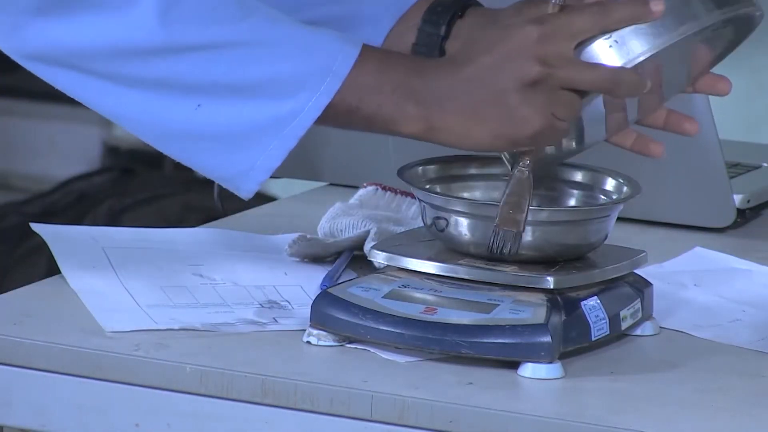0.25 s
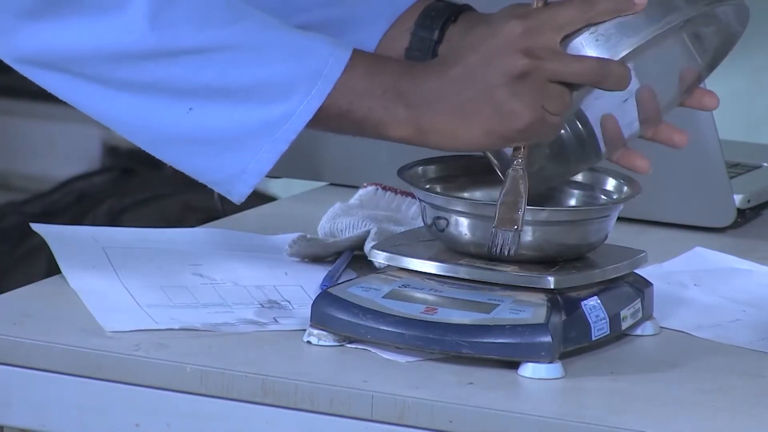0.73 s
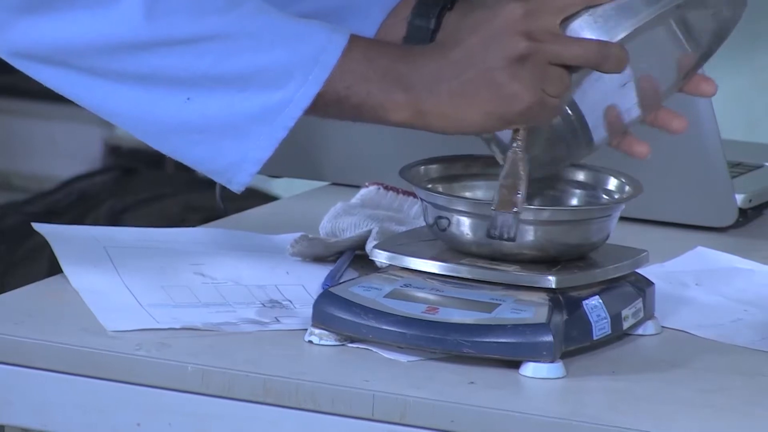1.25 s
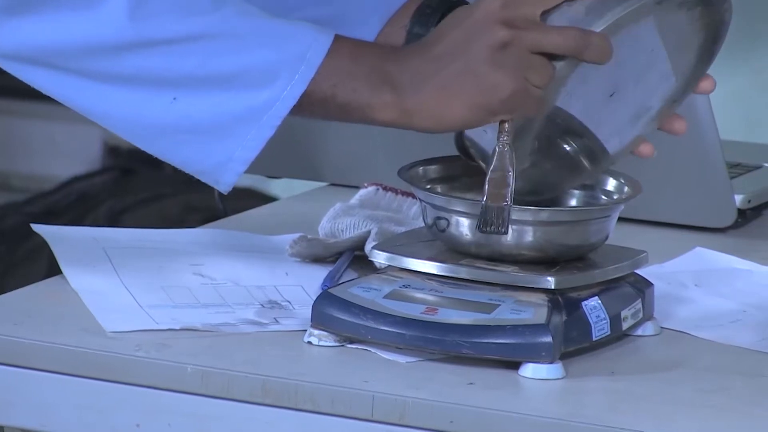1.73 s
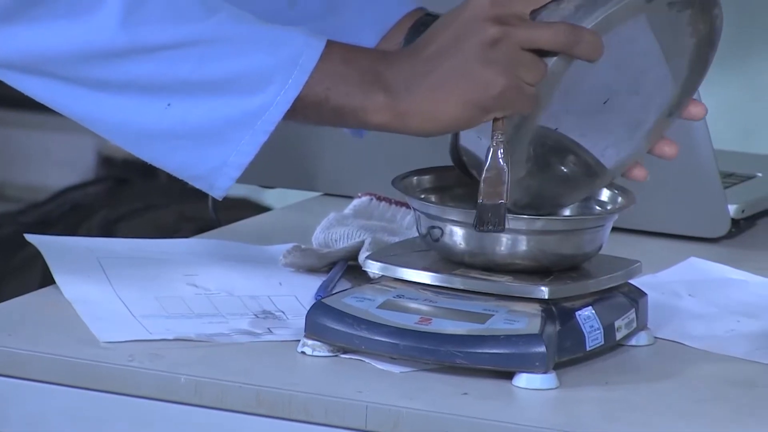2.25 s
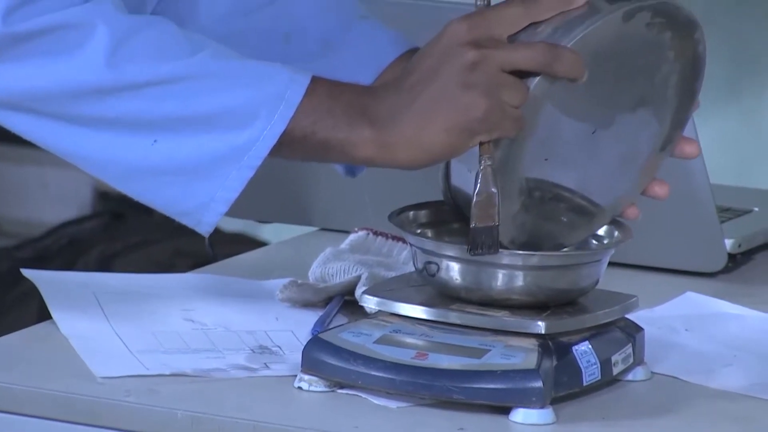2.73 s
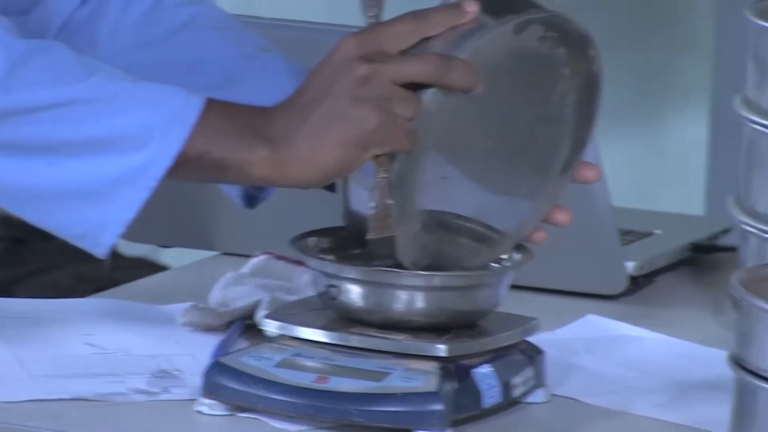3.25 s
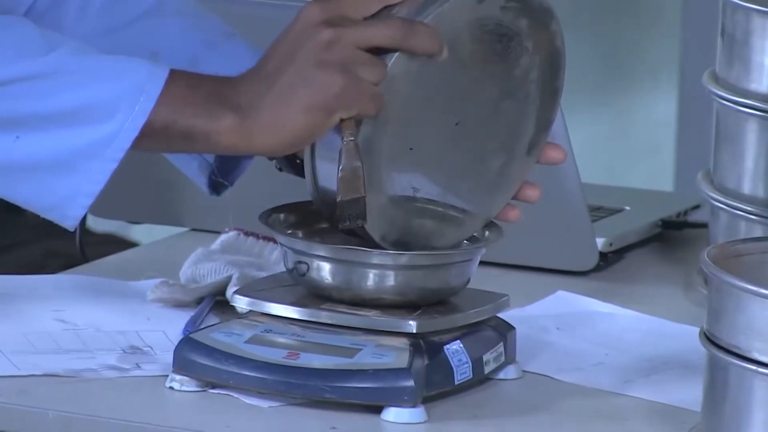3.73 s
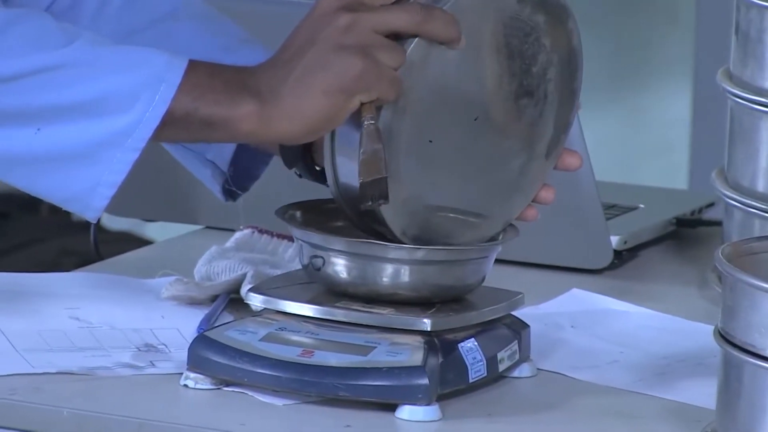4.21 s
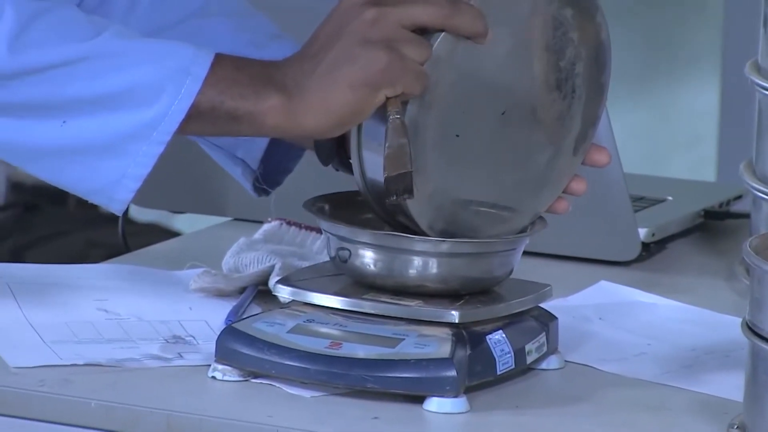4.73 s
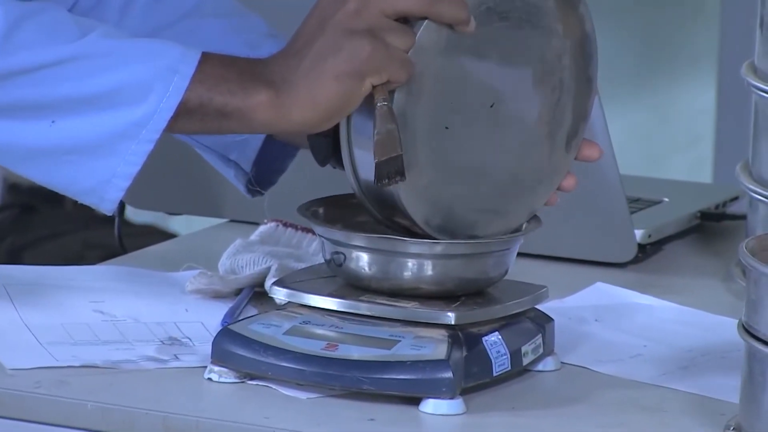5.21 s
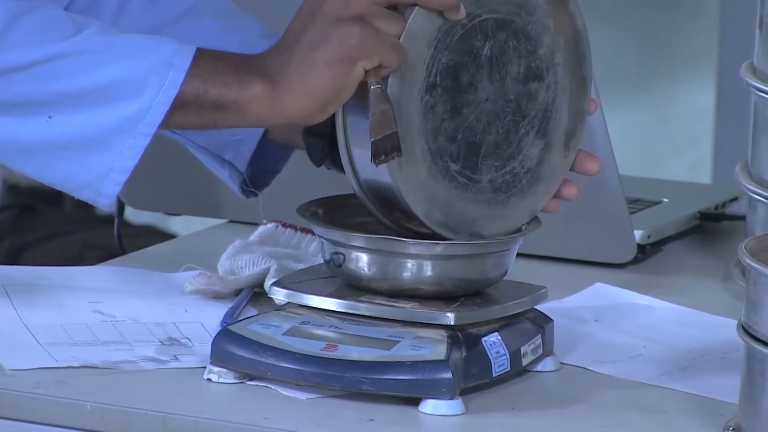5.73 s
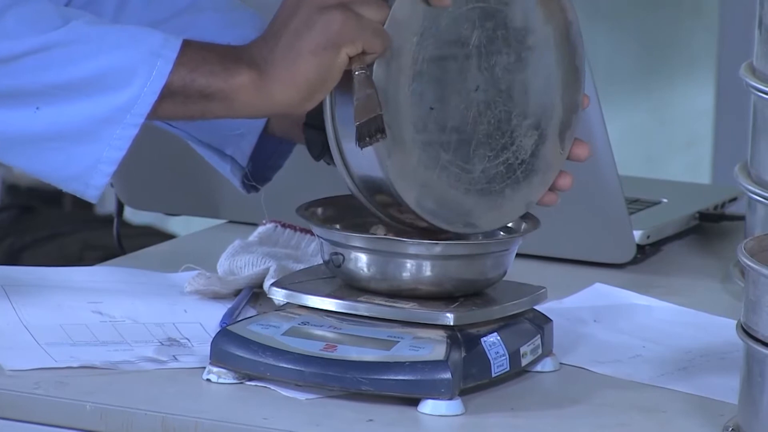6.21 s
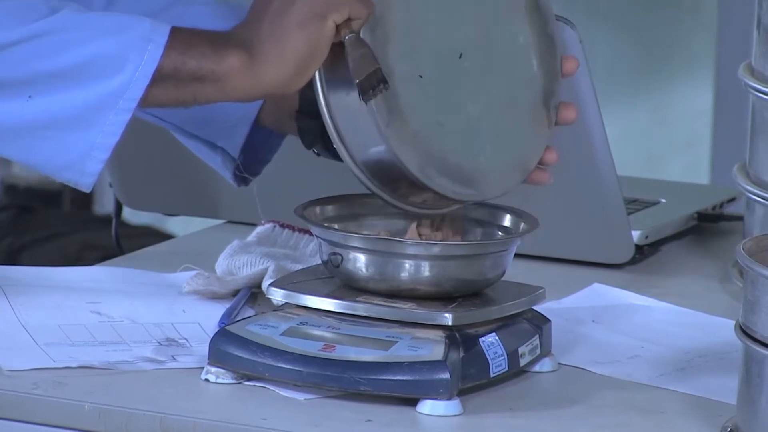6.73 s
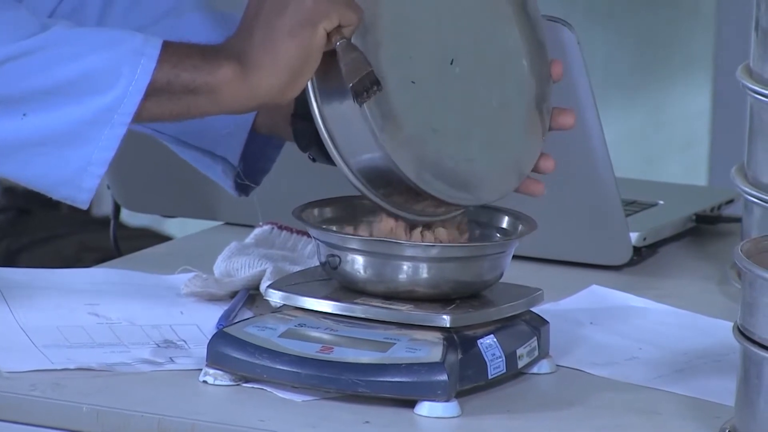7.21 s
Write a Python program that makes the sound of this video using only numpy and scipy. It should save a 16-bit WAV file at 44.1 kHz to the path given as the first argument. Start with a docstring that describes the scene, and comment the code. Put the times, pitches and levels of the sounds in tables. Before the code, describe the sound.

A close view of small dry stones being tipped from a metal pan into a steel bowl in a hard, lightly echoing room with steady low ventilation noise and faint hiss. From 0 to 1.8 s only faint ticks, a soft knock and slight grit are heard. Around 1.9-2.4 s a sudden cluster of sharp, loud clinks and hollow knocks breaks out, then falls back to a few clicks. From about 3 s stones strike more often, the bowl ringing at 3.3-3.7 s, and a dense bright rattle peaks around 4.2-4.9 s. From 5 to 5.8 s it thins to dull hollow knocks and light clicks. At 5.8-6.3 s a second, softer gravel slide comes with quick pan knocks and thin ringing. After a lull, sparse ticks and little clicks return from 6.8 to the end. Bright hits carry a deep, muffled thump.

```python
"""In a hard-walled room, small dry stones slide out of a hand-held metal pan into a steel bowl on a scale.
Single stones click and clink: short noise bursts through broad resonances, plus fading sine tones.
Random grains make a dense rattle under them, short hollow knocks sound, and bowl and pan ring on.
Echoes and ventilation noise lie behind. The microphone input rectifies sharp treble, so bright clicks
drag a deep thump behind them."""
import sys
import numpy as np
from scipy import signal
from scipy.fft import rfft, irfft
from scipy.io import wavfile

SR = 44100
rng = np.random.default_rng(int(sys.argv[2]) if len(sys.argv) > 2 else 0)


def pcm_store(signal):
    """Save signal as 16-bit PCM."""
    levels = np.round(np.clip(np.atleast_2d(signal), -1, 1) * 32767)
    wavfile.write(sys.argv[1], SR, levels.astype(np.int16).T)


N = 328986   # length in samples

# All levels below are set ahead of the room and the microphone input.
# "t60" is the time a sound takes to fall by 60 dB.

# Stones that strike. Each row: start in seconds, level in dB, knock and tick in dB relative to that level,
# clink pitch in Hz.
STONE_STRIKES = [(0.3825, -30.5, -12, -5.5, 3030), (0.7109, -48, 4.5, 20.5, 3500),
                 (1.0841, -41, -25, 13, 3336), (1.277, -40.5, 5.5, -40, 2380), (1.6405, -48.5, 3, 13, 2510),
                 (1.7315, -40.5, 6, -1, 1930), (1.8923, -18.5, -0.5, 1.5, 2930),
                 (2.0691, -31, -35, 9, 4750), (2.194, -5.5, -20, -6, 1877), (2.2493, -17.5, -5, 2.5, 4860),
                 (2.2679, -7, -42, -10, 3070), (2.333, -23, -25, -0.5, 3290),
                 (2.373, -22, -16, -10.5, 2460), (2.537, -31.5, -28, -22, 4310),
                 (2.924, -42.5, -41, -1.5, 2480), (3.02, -18.5, 1.5, -11.5, 3140),
                 (3.055, -23.5, 2.5, -7.5, 3110), (3.0868, -22.5, -3, -7, 3220),
                 (3.261, -31, -31, -2, 1730), (3.3243, -11.5, 2, -6.5, 3060), (3.346, -23, 0, -11, 2480),
                 (3.3976, -29, -20, 6, 3550), (3.4741, -14, 4.5, -2, 3130), (3.515, -12.5, -0.5, -10, 1825),
                 (3.5653, -12.5, -22, -7, 3100), (3.589, -18.5, 9, -9, 1660),
                 (3.66, -7.5, -0.5, -6.5, 3060), (3.764, -18.5, -11, -7, 3040),
                 (3.787, -16.5, -6, -4.5, 3280), (3.8264, -15.5, -9, -7.5, 3010),
                 (3.949, -18.5, -2, -3, 3470), (4.0143, -28, -30, -9.5, 3370),
                 (4.1596, -17.5, 1.5, -43, 3080), (4.214, -14, -0.5, -5, 3180),
                 (4.2698, -7, -9.5, -14, 3480), (4.4849, -7, -3, -11, 3180), (4.5259, -5, -13, -10, 3470),
                 (4.561, -7.5, -7, -18, 3280), (4.6294, -8, -3, -11, 3504), (4.672, -11.5, -35, -9, 3440),
                 (4.743, -13.5, 8.5, -18, 1840), (4.805, -9.5, 5, -18, 2630),
                 (4.9137, -32.5, 17.5, 5, 2900), (5.098, -28.5, 0.5, -9, 3390), (5.175, -31, 1, -6, 2860),
                 (5.2747, -33, 7, 11, 1980), (5.322, -27, 4, 7, 2140), (5.342, -21.5, -35, -24, 2840),
                 (5.5294, -34.5, 5, -31.5, 3610), (5.765, -37.5, -24, -5.5, 3040),
                 (5.8303, -33, 17, -20, 3330), (5.859, -22, 8, -0.5, 2150), (5.9424, -21.5, 3.5, -28, 2010),
                 (6.0451, -18.5, -1.5, -5, 1920), (6.1813, -27, 17, -24, 2760),
                 (6.209, -19.5, 10, -7, 1953), (6.32, -32, 13.5, 5, 2220), (6.79, -39, -6.5, 5.5, 2710),
                 (6.8983, -54, -16, 22, 2700), (6.98, -38, -5, 3.5, 1910), (7.126, -31, 0, -25, 2070),
                 (7.188, -21.5, 1, -25, 2800), (7.3107, -22.5, -20, -12.5, 2020),
                 (7.366, -29, -14, -25, 3900)]
# Broad resonances of a contact, from dull to bright. Each row: pitch in Hz, width in Hz, relative level in dB.
KNOCK_COLOUR = [(234.6, 15, 16), (617, 314, 29), (1070, 88, 5)]
CLACK_COLOUR = [(1750, 560, 13.83), (2635, 210, 19.26), (3210, 470, 18.57), (5050, 3060, 9.1)]
TICK_COLOUR = [(6830, 820, 10.4), (8890, 1110, 8.8), (13100, 4200, 3.3)]
# Gravel rolling in the hollow pan. Each row: pitch in Hz, width in Hz, relative level in dB.
ROLL_COLOUR = [(432, 111, -1.5), (527, 109, 1.5), (980, 403, -3)]
# Gravel slides. Each row: start in seconds, end in seconds, rattle level in dB at the start and at the end,
# knock and tick in dB relative to the rattle.
GRAVEL_SLIDES = [(0.12, 0.337, -79, -65.5, 15.5, 3), (1.749, 1.87, -52, -64.5, 15.5, -11),
                 (1.904, 1.997, -37.5, -37.5, -9, 4.5), (2.004, 2.19, -67, -47, -36, -14),
                 (2.29, 2.404, -32, -37, -8, -45), (3.278, 3.426, -41, -36.5, 1.5, -11.5),
                 (3.477, 3.694, -31, -30.5, 0.5, -8), (3.743, 3.98, -25.5, -36, -7, -12),
                 (4.162, 4.276, -41, -22.5, -8.5, -14), (4.499, 4.691, -25, -26, -4, -9),
                 (4.769, 4.914, -23, -27, -1.5, -16), (5.092, 5.35, -48, -39, -36.5, -8.5),
                 (5.848, 6.202, -31, -30, -3.5, -4), (6.312, 6.485, -40.5, -44.5, -25, -2),
                 (6.683, 7.09, -71.5, -54, -18, 4.5), (7.115, 7.191, -50, -34, 1, 0),
                 (7.334, 7.46, -42, -44, -14, 2)]
# Grains always stirring in the pan. One row: knock, rattle and tick level in dB.
RUSTLE_LEVELS = [-65, -75.5, -73]
# Short hollow knocks, some from the pan bottom. Each row: start in seconds, level in dB, pitch in Hz.
HOLLOW_KNOCKS = [(0.267, -44, 680), (2.195, -11, 1014), (2.25, -8, 1195), (2.279, -12, 1115),
                 (2.299, -20, 990), (4.975, -12, 726), (5.062, -25, 723), (5.177, -12, 520),
                 (5.229, -24, 538), (5.292, -16.5, 563), (5.337, -12.5, 708), (5.817, -21, 480),
                 (5.891, -17, 674), (5.971, -27, 850), (6.045, -16, 715), (6.1, -11.5, 512),
                 (6.146, -12, 580), (6.179, -10, 492), (6.2, -10, 573), (7.088, -18.5, 450),
                 (7.305, -21, 525)]
# Grit that ticks on the steel. Each row: start in seconds, level in dB.
GRIT_TICKS = [(0.414, -34), (0.482, -40), (0.7363, -36.5), (0.7918, -44.5), (6.502, -47), (6.573, -31),
              (6.856, -36), (7.155, -26.5), (7.445, -27)]
# Ringing tones (modes) of the steel bowl. Each row: pitch in Hz, t60 in seconds.
BOWL_MODES = [(408, 1.1), (1040, .4), (1729, .35), (1843, .6), (1976, .25), (2282, .6), (2425, .7),
              (3073, .3), (3728, 1.2), (4795, .4)]
# One relative level in dB for each bowl mode.
BOWL_MODE_LEVELS = [-1, -3, -3, 5, 0, 1, 1, -4, -1, -4]
# Blows that set the bowl wall ringing. Each row: start in seconds, then dB for its low, middle, high,
# long-singing and top modes.
BOWL_BLOWS = [(2.07, -70, -60, -60, -75, -36), (2.195, -42, -23, -27, -60, -24),
              (2.3, -33, -34, -32, -65, -29), (3.35, -21, -28, -36, -45, -40),
              (3.419, -32, -22, -27, -40, -36), (3.512, -30, -17, -25, -36, -34),
              (3.705, -28, -25, -24, -24, -36), (4.63, -45, -29, -45, -60, -50)]
# Ringing tones (modes) of the hand-held pan. Each row: pitch in Hz, t60 in seconds.
PAN_MODES = [(1995, .12), (2822, .3), (3750, .25), (4160, .3), (4508, .4), (6100, .25), (7045, .3),
             (7967, .3)]
# One relative level in dB for each pan mode.
PAN_MODE_LEVELS = [20, 13.5, 10.5, 3, 4, -6, -9, -4]
# Taps that ring the pan. Each row: start in seconds, then dB for its low, middle and high modes.
PAN_TAPS = [(5.905, -58, -34.5, -39), (6.066, -34.5, -45, -29), (6.22, -44.5, -56.5, -37),
            (7.195, -47, -55, -34.5), (7.375, -72, -53, -36.5)]
# Shape of the ventilation noise. Each row: pitch in Hz, relative level in dB per Hz.
ROOM_TONE_SHAPE = [(30, 12.5), (75, 0), (204, -3.5), (266, -7.5), (499, -7.5), (540, -10), (962, -17.5),
                   (4910, -36.5), (14400, -39)]

TUMBLE_T60_S = 0.13
CLINK_DB, CLINK_T60_S = -0.5, 0.057   # relative to the stone
GRAINS_PER_S, ROLLS_PER_S, GRAIN_SPREAD_DB = 520, 180, 4
RISE_DB_PER_S, FALL_DB_PER_S = 476, 147.5   # a slide sets in fast and settles slowly
ROLL_SMOOTH = 0.4   # steady scuffing added to the rolling grains
PAN_FED_DB = -55   # how strongly sliding gravel keeps the pan modes sounding
PAN_FREE_S = 5.8   # from here the emptying pan rings under the gravel
PINGS_PER_S, PING_DB, PING_T60_S = 300, -5, 0.04   # level relative to the rattle
HOLLOW_T60_S, HOLLOW_ROUGH = 0.038, 0.65   # roughness as a share of the note
SHEET_DB = -43.5
ROOM_T60_S, ROOM_DB, WALL_CUT_HZ = 0.33, -7, 1300
ROOM_TONE_DB = -48.5   # loudness (rms) above 31 Hz
CUTOFF_HZ = 16450


def stones():
    """Each strike is noise shaped into knock, clack and tick, plus a clink of fading sines."""
    starts_s, level, knock, tick, clink_hz = np.transpose(STONE_STRIKES)
    hits = colour(crunch(level + knock), KNOCK_COLOUR)
    hits = hits + colour(crunch(level), CLACK_COLOUR)
    hits = hits + colour(crunch(level + tick), TICK_COLOUR)

    t, clinks = np.arange(SR // 5) / SR, np.zeros(N)
    starts = np.round(starts_s * SR).astype(int)
    others = 1750 * 2.4 ** rng.random((len(starts), 5))   # five more pitches in Hz, new at each strike
    for start, db, hz, more_hz in zip(starts, level, clink_hz, others):
        extra = np.sin(2 * np.pi * more_hz[:, None] * t).sum(axis=0)
        tones = np.sin(2 * np.pi * hz * t) + amp(-10) * extra
        clink = amp(db + CLINK_DB - 60 * t / CLINK_T60_S) * tones
        clinks[start:start + len(t)] += clink[:N - start]
    flutter = rms_one(butter(rng.standard_normal(N), 200, "low"))
    return hits + clinks * (1 + 0.4 * flutter)


def crunch(db):
    """A stone cracks on the metal within about 2 ms, then tumbles on in smaller uneven contacts."""
    clicks = train(STONE_STRIKES, db)
    crack = dying(clicks, t60=0.03) - dying(clicks, t60=0.008)   # the difference rises, then falls
    tumble = amp(-10.5) * dying(clicks, TUMBLE_T60_S) * grains(350)
    return (crack + tumble) * rng.standard_normal(N)


def rattle():
    """Many small grains of noise pass through the contact colours, swelling with each slide."""
    t = np.arange(0, N, 32) / SR   # the levels move in steps of 32 samples
    strength = amp(RUSTLE_LEVELS)[:, None]
    for start, end, first_db, last_db, knock, tick in GRAVEL_SLIDES:
        db = np.interp(t, [start, end], [first_db, last_db])
        db = db - RISE_DB_PER_S * np.maximum(start - t, 0)
        db = db - FALL_DB_PER_S * np.maximum(t - end, 0)
        strength = strength + amp(db + np.array([[knock], [0], [tick]]))
    strength = np.repeat(strength, 32, axis=1)[:, :N]

    fine = grains(GRAINS_PER_S)
    rolling = ROLL_SMOOTH + grains(ROLLS_PER_S)
    low, mid, high = strength * [rolling, fine, fine] * rng.standard_normal((3, N))
    gravel = colour(low, ROLL_COLOUR) + colour(mid, CLACK_COLOUR) + colour(high, TICK_COLOUR)
    return gravel + pings(strength[1]) + amp(PAN_FED_DB) * fed_pan(mid)


def pings(strength):
    """Random pebbles each ring one of 16 pitches in the clack range, as loud as the slide is strong."""
    sizes = amp(3.5 * np.minimum(rng.exponential(1, N), 4))
    sizes = sizes * (rng.random(N) < PINGS_PER_S / SR)
    dealt = rng.integers(0, 16, N)   # which pitch each pebble gets
    pitches = np.geomspace(1750, 4700, 16)
    rings = sum(ring(sizes * (dealt == k), hz, PING_T60_S) for k, hz in enumerate(pitches))
    return amp(PING_DB) * strength * rms_one(rings)


def fed_pan(gravel):
    """The noise of moving gravel keeps the ringing tones of the emptying pan going."""
    late = np.arange(N) > PAN_FREE_S * SR
    return sum(amp(db) * ring(gravel * late, hz, t60)
               for (hz, t60), db in zip(PAN_MODES, PAN_MODE_LEVELS))


def hollow_knocks():
    """Each hollow knock is a short sine note, roughened by slow noise."""
    out, t = np.zeros(N), np.arange(SR // 5) / SR
    for start_s, db, hz in HOLLOW_KNOCKS:
        start = int(start_s * SR)
        onset = np.minimum(t / 0.0018, 1)   # 1.8 ms fade-in
        note = amp(db - 60 * t / HOLLOW_T60_S) * np.sin(2 * np.pi * hz * t) * onset
        out[start:start + len(t)] += note[:N - start]
    roughness = rms_one(butter(rng.standard_normal(N), 167, "low"))
    return out * (1 + HOLLOW_ROUGH * roughness)


def grit():
    """Tiny bright ticks: very short noise bursts in the tick colour."""
    burst = dying(train(GRIT_TICKS, np.array(GRIT_TICKS)[:, 1]), t60=0.016)
    return colour(burst * rng.standard_normal(N), TICK_COLOUR)


def bowl():
    """The bowl sings in its own tones when the pan or a large stone hits it."""
    return struck(BOWL_BLOWS, BOWL_MODES, BOWL_MODE_LEVELS, [1500, 2100, 3400, 4000])


def tapped_pan():
    """Taps set the tones of the pan ringing; most die sooner than those of the bowl."""
    return struck(PAN_TAPS, PAN_MODES, PAN_MODE_LEVELS, [4000, 4300])


def struck(blows, modes, levels, splits):
    """Each blow sets all modes ringing, with levels that vary a little; splits in Hz part the groups."""
    rows = np.array(blows)
    spot = rng.normal(0, 0.38, (len(rows), len(modes)))   # small random changes in dB
    out = 0
    for k, ((hz, t60), db) in enumerate(zip(modes, levels)):
        group = 1 + np.searchsorted(splits, hz)   # the column of blows that holds this mode's level
        out = out + ring(train(blows, rows[:, group] + db + spot[:, k]), hz, t60)
    return out


def sheet(x):
    """Thin steel has crowded upper modes: every contact shimmers in them for a moment."""
    pitches = np.linspace(1900, 12800, 48) + rng.uniform(-100, 100, 48)
    return sum(ring(x, hz, t60) for hz, t60 in zip(pitches, rng.uniform(0.014, 0.073, 48)))


def dip_1500(x):
    """A notch filter makes a narrow dip near 1.5 kHz."""
    w = 2 * np.pi * 1520 / SR
    dip = [1, -2 * 0.985 * np.cos(w), 0.985 ** 2]
    refill = [1, -2 * 0.96 * np.cos(w), 0.96 ** 2]   # keeps the dip narrow
    return signal.lfilter(dip, refill, x)


def room(x):
    """A dense tail of reflections, as fading noise, dulled by the walls."""
    t = np.arange(SR) / SR
    tail = rng.standard_normal(SR) * amp(-60 * t / ROOM_T60_S) * (t > 0.006)
    dulled = butter(x, WALL_CUT_HZ, "low", order=1)
    return signal.fftconvolve(dulled, tail / np.linalg.norm(tail))[:N]


def room_tone():
    """Steady ventilation rumble and hiss: noise shaped across the pitch range."""
    hz, db = np.transpose(ROOM_TONE_SHAPE)
    grid = np.fft.rfftfreq(N, 1 / SR) + 1   # 1 Hz added to avoid log(0)
    shape = amp(np.interp(np.log(grid), np.log(hz), db))
    noise = irfft(rfft(rng.standard_normal(N)) * shape, N)
    return amp(ROOM_TONE_DB) * noise / np.std(butter(noise, 31, "high", order=4))


def grains(per_s):
    """Contacts at random moments with uneven sizes, each dying away in milliseconds; rms 1."""
    sizes = amp(GRAIN_SPREAD_DB * np.minimum(rng.exponential(1, N), 4))
    return rms_one(dying(sizes * (rng.random(N) < per_s / SR), t60=0.021))


def train(rows, db):
    """One click at each row's start, with a level in dB."""
    clicks = np.zeros(N)
    clicks[np.round(np.array(rows)[:, 0] * SR).astype(int)] = amp(db)
    return clicks


def dying(clicks, t60):
    """Each click becomes a level that jumps up and decays."""
    return signal.lfilter([1], [1, -amp(-60 / (t60 * SR))], clicks + 1e-18)


def ring(x, hz, t60):
    """A resonator: a click of size 1 sets a fading sine of height about 1 ringing."""
    r, w = amp(-60 / (t60 * SR)), 2 * np.pi * hz / SR
    return signal.lfilter([0, np.sin(w)], [1, -2 * r * np.cos(w), r * r], x + 1e-18)


def colour(x, peaks):
    """Resonances side by side, scaled so that white noise would keep its rms."""
    both, out = np.stack([x, rng.standard_normal(N)]), 0   # the second row is test noise for the scaling
    for k, (hz, width, db) in enumerate(peaks):
        r = np.exp(-np.pi * width / SR)
        poles = [1, -2 * r * np.cos(2 * np.pi * hz / SR), r * r]
        band = signal.lfilter([(1 - r * r) / 2, 0, (r * r - 1) / 2], poles, both)
        out = out + (-1) ** k * amp(db) * band   # neighbours alternate in sign
    return out[0] / np.std(out[1])


def butter(x, hz, kind, order=2):
    """Butterworth filter: keeps the lows or the highs, as kind says."""
    return signal.sosfilt(signal.butter(order, hz, kind, fs=SR, output="sos"), x)


def rms_one(x):
    """Scale to an average strength (rms) of 1."""
    return x / np.sqrt(np.mean(x ** 2) + 1e-20)


def amp(db):
    """Decibels to gain."""
    return 10 ** (np.asarray(db) / 20)


def scene():
    """Contacts and ringing steel, dipped near 1.5 kHz, then the room and the room tone."""
    contacts = stones() + rattle() + hollow_knocks() + grit()
    steel = amp(SHEET_DB) * sheet(contacts) + bowl() + tapped_pan()
    near = dip_1500(contacts + steel)
    return (near + amp(ROOM_DB) * room(near) + room_tone())[None]


def record(dry):
    """Rectified treble leaks into the deep bass as one slow swing; peaks are rounded, the top is cut."""
    rectified = np.abs(butter(dry, 10000, "high", order=4)) ** 0.71
    thump = butter(rectified, 34.2, "low")
    thump = butter(butter(thump, 22, "high"), 1.6, "high")
    rounded = np.tanh(dry * amp(-7.5) + amp(22.0) * thump)
    return signal.sosfilt(signal.cheby2(12, 70, CUTOFF_HZ, fs=SR, output="sos"), rounded)


dry = scene()
out = record(dry)
pcm_store(out)
```